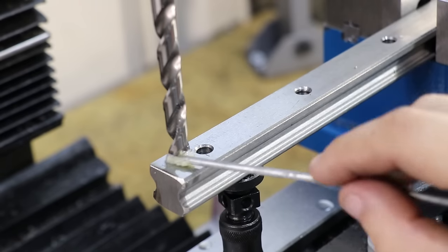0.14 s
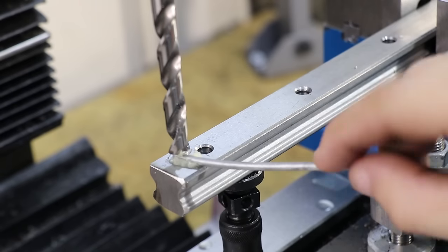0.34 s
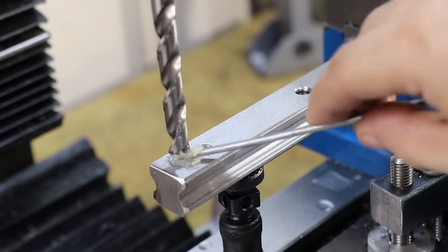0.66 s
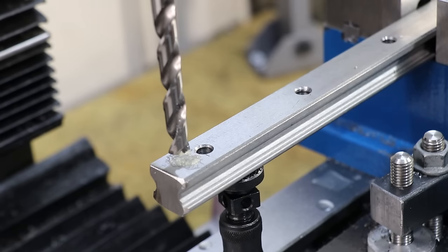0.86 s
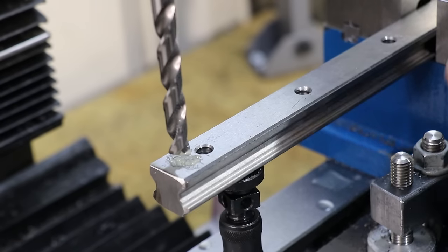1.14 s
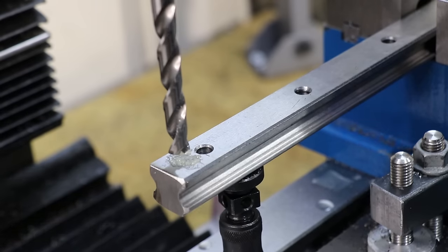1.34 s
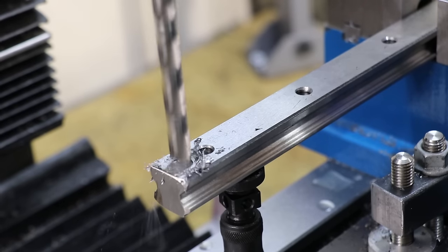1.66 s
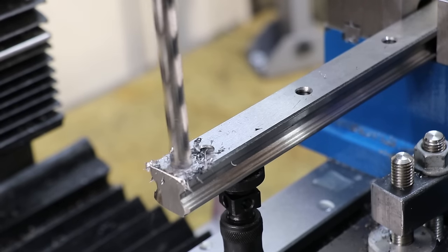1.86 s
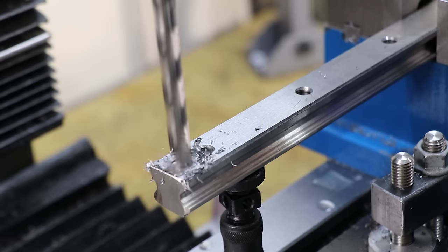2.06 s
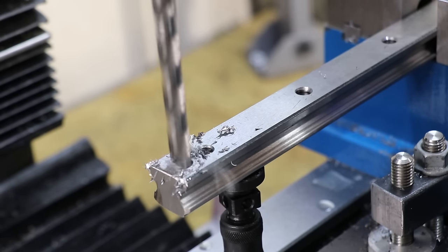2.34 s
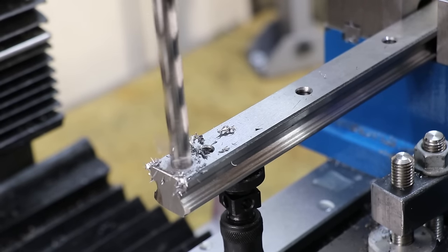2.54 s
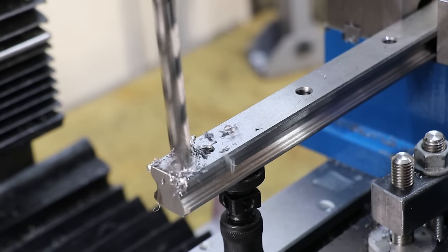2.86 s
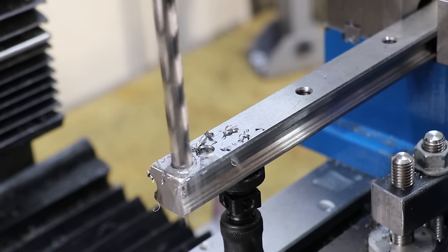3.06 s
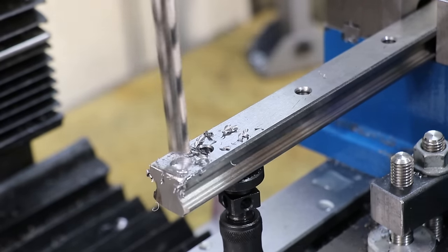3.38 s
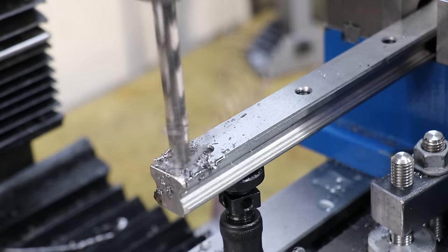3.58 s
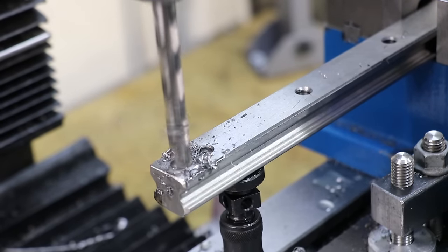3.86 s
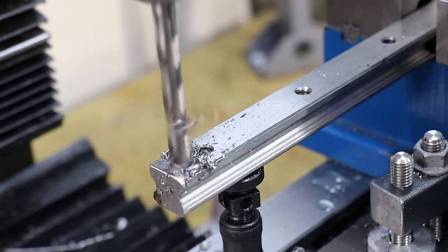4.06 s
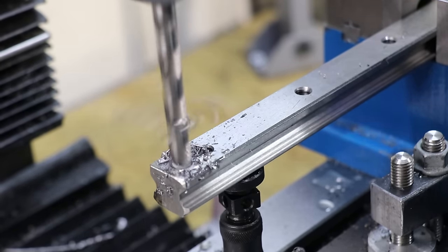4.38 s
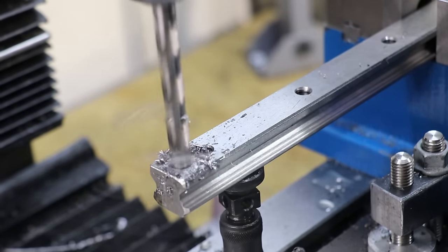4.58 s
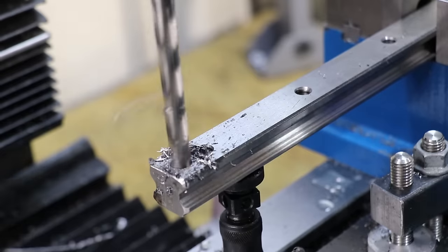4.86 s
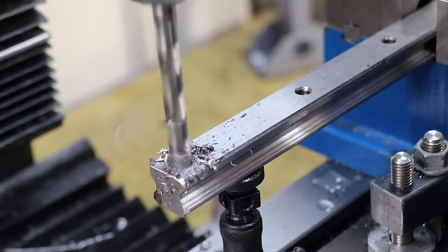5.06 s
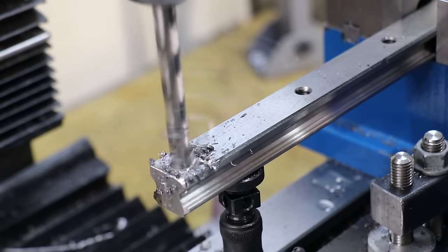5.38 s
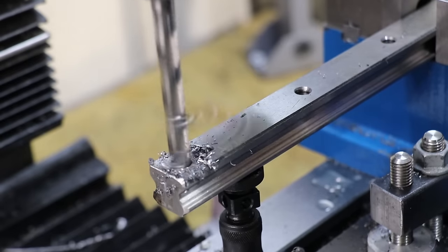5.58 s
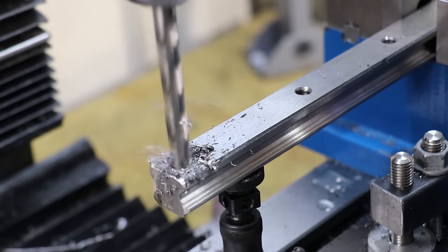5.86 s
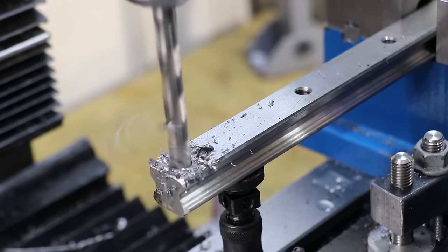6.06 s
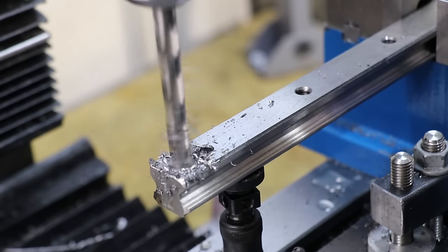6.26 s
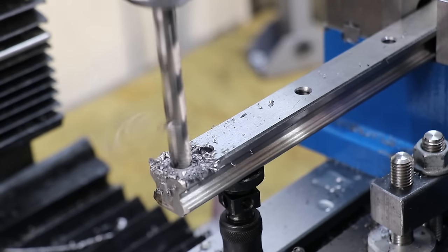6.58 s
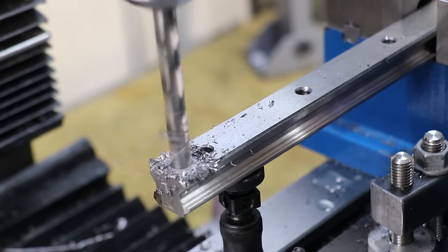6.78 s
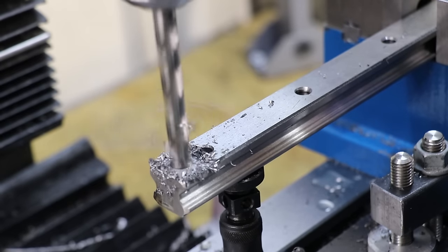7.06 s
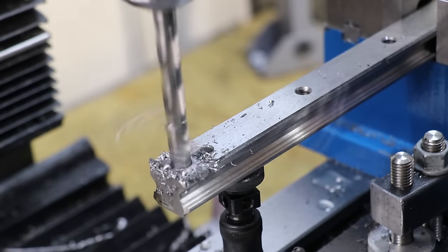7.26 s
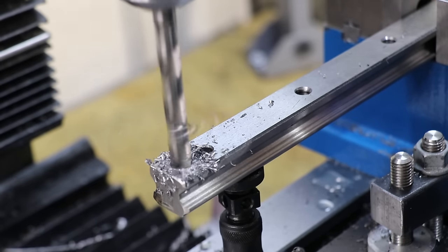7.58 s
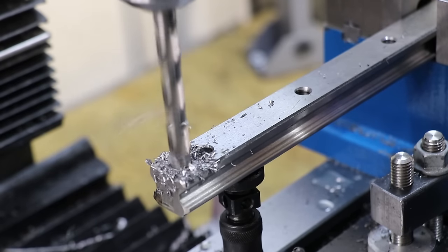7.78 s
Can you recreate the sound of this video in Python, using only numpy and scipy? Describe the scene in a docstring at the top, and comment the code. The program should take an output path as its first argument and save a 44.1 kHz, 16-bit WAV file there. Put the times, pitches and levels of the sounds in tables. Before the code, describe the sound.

Close stereo pickup in a quiet workshop with soft air noise and a low hum. A wire dabs grease on a steel rail with tiny taps, short hisses and thin squeaks. A switch clacks loudly, then weaker, and drilling bursts in: a dense, bright, gritty roar and hiss. Six times the drill lifts, the hiss drops, a hoarse feed whine and dull knocks show through, and cutting bites again.

```python
"""Wire taps, hisses and thin squeaks come first, over workshop air and a low hum; then a switch clacks.
From START_S on a milling machine drills close by: shaped noise roars in the frame and hisses with the chip load.
Six times the drill backs out: the hiss drops, wandering tooth-rate harmonics whine from the feed drive,
and dull noise bursts knock around the lifts and reversals. Taps, knocks and catching chips are decaying
noise bursts; the switch adds sharp snaps and damped sines."""
import sys
import numpy as np
from scipy import signal
from scipy.fft import rfft, irfft, next_fast_len
from scipy.io import wavfile
from scipy.ndimage import uniform_filter1d

SR = 44100
rng = np.random.default_rng(int(sys.argv[2]) if len(sys.argv) > 2 else 0)


def dump(signal):
    """Clip the signal to [-1, 1] and save it as 16-bit WAV at the path in sys.argv[1]."""
    limited = np.clip(np.atleast_2d(signal).T, -1, 1)
    pcm = np.round(limited * 32767).astype(np.int16)
    wavfile.write(sys.argv[1], SR, pcm)


N = 349272
T = np.arange(N) / SR
SIZE = next_fast_len(N + SR)  # room for filter tails
F = np.maximum(np.arange(SIZE // 2 + 1) * SR / SIZE, 1)  # Hz

# The drill backs out: lift_s, feed_reverses_s, whine_ends_s
PECK_TIMES = [(3.19, 3.522, 3.535), (3.692, 3.845, 3.868), (4.733, 4.978, 5.028), (5.613, 5.768, 5.838),
              (6.44, 6.562, 6.632), (7.36, 7.545, 7.638)]
# Whine and load at each peck: tenth_harmonic_hz (at the lift), tenth_db, ninth_first_db, ninth_last_db,
# clear_load_db (chip load while out of the cut)
PECK_WHINES = [(1805, -32, -39, -31, -46), (1843, -32, -50, -37, -48), (1810, -31, -45, -39, -48.5),
               (1827, -32, -57, -40, -46), (1818, -31, -56, -35.5, -50), (1824, -32, -53, -37, -51)]

START_S, SPINDLE_HZ = 1.6875, 33.9
TOP_HZ = 15850

# A random phase offset between the two ports, wandering over frequency and widest in the treble
TWIST_RAD, TWIST_HZ = 1.75, 501
TWIST = TWIST_RAD * F / TOP_HZ * np.interp(F, TWIST_HZ * np.arange(60), rng.standard_normal(60))


def undb(db):
    """Decibels to amplitude."""
    return 10 ** (np.asarray(db) / 20)


def unit(x):
    """Scale to rms 1."""
    return x / np.sqrt(np.mean(x ** 2))


def over_hz(points):
    """Values of (Hz, value) points at every frequency, straight over log frequency."""
    hz, value = np.transpose(points)
    return np.interp(np.log(F), np.log(hz), value)


def shape(points):
    """Gain over frequency from (Hz, dB) points."""
    return undb(over_hz(points))


def peaks(modes):
    """Gain over frequency of steep-sided resonances whose powers add."""
    power = 0
    for hz, width_hz, db in modes:
        power = power + undb(2 * db) / (1 + (1.35 * (F - hz) / width_hz) ** 2) ** 2
    return np.sqrt(power)


def track(points):
    """The value of an (s, dB) curve at every sample."""
    return np.interp(T, *np.transpose(points))


def gate(start, end, fade_s):
    """Open between two times, with straight fades inside them."""
    return np.clip(np.minimum(T - start, end - T) / fade_s, 0, 1)


def walk(rate):
    """Random levels held 1 / rate s and slewed twice; spread near 1."""
    hold = int(SR / rate)
    steps = np.repeat(rng.standard_normal(N // hold + 1), hold)
    return 0.75 * uniform_filter1d(uniform_filter1d(steps, hold), hold)[:N]


def add(out, s, sound):
    """Mix a sound in at a time, cut at the end of the scene."""
    i = int(s * SR)
    out[:, i:i + sound.shape[-1]] += sound[..., :N - i]


def stereo(near, far):
    """Two spectra into two close microphone ports: how alike and how loud they are varies with pitch."""
    # Likeness between the ports: pitch_hz, likeness (0-1)
    likeness = [(60, .95), (130, 0.83), (290, 0.83), (640, 0.95), (1410, 0.97), (2400, 0.79), (4400, 0.43),
                (8000, 0.48), (15000, 0.44)]
    # Balance between the ports: pitch_hz, left_minus_right_db
    balance = [(60, 6), (110, 0), (200, 2), (380, 0.0), (700, 0.5), (1290, 1), (2380, 1.0), (4400, -0.5),
               (8120, -2.0), (15000, -3)]
    alike = np.clip(over_hz(likeness), 0, 1)
    lean = np.sqrt(shape(balance)) * np.exp(.5j * TWIST)
    same = np.sqrt((1 + alike) / 2) * near
    apart = np.sqrt((1 - alike) / 2) * far
    return irfft(np.array([(same + apart) * lean, (same - apart) / lean]), SIZE)[:, :N]


def rumble(gain, flicker_db, turn):
    """Gritty resonant noise at rms 1; each octave flickers alone and throbs once and twice a spindle turn."""
    grit = undb(1.5 * walk(900))
    mid, side = (rfft(grit * rng.standard_normal(N), SIZE) * gain for _ in range(2))
    edges_hz = 150 * 2 ** np.arange(0, 7.5)
    out = 0
    for lo, hi in zip(edges_hz[:-1], edges_hz[1:]):
        band = (F >= lo) & (F < hi)
        angle = 2 * np.pi * (SPINDLE_HZ * T + rng.random())
        throb = 1 + turn * (np.sin(angle) + np.sin(2 * angle))
        out = out + stereo(mid * band, side * band) * throb * undb(flicker_db * walk(12))
    return unit(out)


def hoarse(phase, width_hz, rough):
    """A tone whose size and phase wander; rms 1."""
    wander = walk(width_hz) + 1j * walk(width_hz)
    return unit(np.real((1 + rough * wander) * np.exp(1j * phase)))


def burst(hz, width, t60, rise_s):
    """Decaying noise around one pitch, peak near 1, slightly different at each port."""
    t = np.arange(int(.3 * SR)) / SR
    edges_hz = [max(hz - width / 2, 60), min(hz + width / 2, 17000)]
    sos = signal.butter(2, edges_hz, "band", fs=SR, output="sos")
    mid, side = signal.sosfilt(sos, rng.standard_normal((2, len(t))))
    pair = unit(mid) + 0.42 * unit(side) * np.array([[1], [-1]])
    return 0.41 * pair * (1 - np.exp(-t / rise_s)) * 1000 ** (-t / t60)


def shop():
    """Workshop air as shaped noise, lower once the drill runs, under a low hum that comes and goes."""
    # Spectrum of the air: pitch_hz, relative_db_per_hz
    air_spectrum = [(50, -38), (85, -12), (116, -5.5), (175, -7.5), (223, -5), (310, -4), (353, -6),
                    (412, -10), (697, -9.5), (2180, -11.5), (2600, -15.5), (16000, -22)]
    # Hum passages: start_s, length_s, pitch_hz, glide_hz_per_s, level_db
    hums = [(.0, .42, 129.8, -3, -67), (.52, .2, 149, 60, -66), (.76, .22, 172, -30, -69),
            (1.18, .1, 184, 1, -61), (1.33, 0.44, 169.5, 12, -66.5), (3.15, .3, 108, 3, -75),
            (3.673, 0.24, 111, -20, -69), (4.053, .4, 116, -29, -71), (4.4, 0.4, 105, -2, -68),
            (5.6, .4, 110, -20, -69.5), (6.181, 0.52, 101.6, 11, -71), (7.3, .22, 102, 1, -73)]
    air_db, duck_db, hum_fade_s = -57, -2.5, 0.057
    mid, side = (rfft(rng.standard_normal(N), SIZE) * shape(air_spectrum) for _ in range(2))
    level_db = air_db + duck_db * (T > START_S) + 0.34 * walk(3.5)
    out = unit(stereo(mid, side)) * undb(level_db)
    for s, length, hz, glide, db in hums:
        phase = 2 * np.pi * (hz + glide * (T - s) / 2) * (T - s)
        out = out + gate(s, s + length, hum_fade_s) * undb(db) * hoarse(phase, 5.3, 0.34)
    return out


def wire():
    """A wire dabs grease on a steel rail: small taps, slides hissing in its resonances, thin squeaks."""
    # Taps: start_s, peak_db, pitch_hz, t60_s
    taps = [(0.0624, -39.5, 3030, .26), (.1825, -39.5, 3500, .11), (.4788, -43.5, 8000, .043),
            (.54, -47, 7000, .046), (.647, -46, 5000, .06), (.9517, -47, 4500, .12), (1.019, -40, 4130, .1),
            (1.127, -42.5, 4850, 0.16), (1.525, -52, 6100, .059)]
    # Slides: start_s, peak_db (before the rail levels), t60_s
    slides = [(.114, -42, .18), (.183, -40, 0.041), (.65, -50, 0.072), (.786, -42, 0.072)]
    # Rail resonances: pitch_hz, width_hz, relative_db
    rail_modes = [(5310, 500, 1.5), (9900, 980, 0.5), (12300, 990, -5)]
    # Squeaks: centre_s, level_db, length_s
    squeaks = [(.125, -67, .06), (.2, -66, 0.056), (0.343, -62, 0.037), (.42, -67, 0.057),
               (.485, -60, 0.034), (.53, -62, 0.037), (.66, -52, 0.023), (.752, -53, 0.015),
               (0.792, -66, 0.046)]
    squeak_hz = 2165
    swell = sum(undb(db) * np.exp(-(2 * (T - s) / length) ** 2) for s, db, length in squeaks)
    out = swell * hoarse(2 * np.pi * squeak_hz * T, 90.3, 0.96) * np.ones((2, 1))
    for s, db, hz, t60 in taps:
        add(out, s, undb(db) * burst(hz, 0.73 * hz, t60, 0.0011))
    for s, db, t60 in slides:
        add(out, s, sum(undb(db + g) * burst(hz, width, t60, 0.0017) for hz, width, g in rail_modes))
    return out


def switch():
    """Each blow snaps sharply, rings the housing as damped sines and rattles out in noise."""
    # Blows and bounces: start_s, peak_db, left_minus_right_db
    blows = [(1.2018, -10, -5), (1.2075, -19, 5), (1.2114, -7.5, 0.5), (1.2178, -22, -2), (1.221, -23, 0),
             (1.4276, -24, 2), (1.431, -28, -3), (1.437, -43, -1), (1.4435, -33, 7), (1.452, -41, 1)]
    # Ringing modes: pitch_hz, relative_db, t60_s (before the housing damps it)
    modes = [(749, 5, 0.12), (923, 0, 0.13), (1164, 4, 0.41), (1470, 1.5, 0.088), (1650, -4, 0.093),
             (1820, -4, 0.083), (2270, -3, 0.069), (2470, -21, 0.13), (2750, -4, 0.11), (4500, 3, 0.051),
             (4650, -15, 0.077), (4840, -11, 0.051), (5093, -26, 0.19), (5100, -11, 0.3),
             (5860, -21, 0.092), (6870, -20, 0.039), (7946, -28, 0.071), (8489, -33, 0.096),
             (9700, -32, 0.045), (10600, -29, 0.058)]
    housing_t60_s = .085  # no mode rings longer
    out, t = np.zeros((2, N)), np.arange(int(.3 * SR)) / SR
    snap = np.sin(2 * np.pi * 3500 * t) * np.exp(-t / .00016)
    for s, db, pan_db in blows:
        ring = 0
        for hz, mode_db, t60 in modes:
            decay = 1000 ** (-t / min(t60, housing_t60_s))
            ring = ring + undb(mode_db) * np.sin(2 * np.pi * (hz * t + rng.random())) * decay
        rattle = 0.6 * burst(6100, 6000, 0.011, .0001) + 0.26 * burst(2900, 5500, 0.098, 0.001)
        blow = 0.37 * ring / np.abs(ring).max() - 0.99 * snap + rattle
        add(out, s, blow * undb(db + np.array([[pan_db], [-pan_db]]) / 2))
    # too small to radiate bass
    return signal.sosfilt(signal.butter(4, 620, "high", fs=SR, output="sos"), out)


def feed():
    """Backing out: hoarse tooth-rate harmonics, a shaken frame, dull knocks around the lifts and reversals."""
    # Other harmonics: multiple of the tooth rate, level_db (relative to the tenth)
    teeth = [(12, -13.5), (24, -10.5)]
    # Knocks: start_s, peak_db, pitch_hz
    knocks = [(3.189, -40, 308), (3.242, -47, 240), (3.527, -47, 447), (3.681, -43, 366), (3.821, -47, 438),
              (4.721, -43, 320), (4.975, -38.5, 318), (5.18, -50, 427), (5.606, -41.5, 245),
              (5.762, -38.5, 401), (5.864, -43, 299), (6.432, -41, 218), (6.558, -43, 326),
              (7.358, -45, 430), (7.546, -43, 326)]
    # Frame shaken by the fast feed: pitch_hz, width_hz, relative_db
    slide_modes = [(854, 65, -15.5), (1095, 21, -23), (1380, 21, -5), (1707, 150, -6.5), (2353, 90, -4),
                   (2890, 88, -14), (3247, 44, -5.5), (3592, 110, -3.5), (3890, 76, -6.5), (4234, 55, -3.5),
                   (4820, 28, -4.5), (5147, 85, -3.5), (5440, 36, -5.5), (6150, 37, -3), (6850, 22, -2.5),
                   (7400, 78, -13)]
    # Noise between those resonances: pitch_hz, relative_db_per_hz
    slide_bed = [(400, -76), (650, -25.5), (1000, -24.5), (1250, -11), (2300, -16.5), (2630, -23),
                 (4000, -16), (7050, -14.5), (10000, -17.5), (15800, -26)]
    # Low tone in the first lift: time_s, level_db
    groan_curve = [(3.25, -69), (3.3, -57), (3.5, -70), (3.53, -64)]
    # the whine sags, and steps down as the feed reverses
    sag_hz_per_s, down_hz, down_db, turn_s = 85, -45, -9.5, 0.0203
    shake_db, shake_fall_db_per_s, spin_s = -28.5, 109, 0.015
    groan_hz = 414
    hz, tenth, ninth, shake = np.zeros((4, N))
    for (lift, back, end), (top_hz, tenth_db, first_db, last_db, _) in zip(PECK_TIMES, PECK_WHINES):
        on = gate(lift, end, spin_s)
        braking = np.clip(T - back, 0, end - back)  # seconds since the reversal
        down = np.minimum(braking / turn_s, 1)
        hz = hz + (on > 0) * (top_hz - sag_hz_per_s * (T - lift) + down_hz * down)
        tenth = tenth + on * undb(tenth_db + down_db * down)
        ninth = ninth + on * undb(np.interp(T, [lift, back], [first_db, last_db]))
        shake = shake + on * undb(shake_db - shake_fall_db_per_s * braking)
    tooth = 2 * np.pi * np.cumsum(hz / 10) / SR  # phase at the tooth rate
    whine = tenth * hoarse(10 * tooth, 40, 0.13) + ninth * hoarse(9 * tooth, 40, 0.25)
    for multiple, db in teeth:
        whine = whine + tenth * undb(db) * hoarse(multiple * tooth, 150, 1.2)
    groan_level = gate(groan_curve[0][0], groan_curve[-1][0], spin_s) * undb(track(groan_curve))
    groan = groan_level * hoarse(2 * np.pi * groan_hz * T, 25, .3)
    tones = rfft(whine + groan, SIZE)
    slide = np.hypot(peaks(slide_modes), shape(slide_bed))
    out = stereo(tones, tones * 1j)  # a quarter turn sets the ports apart
    out = out + shake * rumble(slide, flicker_db=0.44, turn=0.15)
    for s, db, knock_hz in knocks:
        thud = burst(knock_hz, 145, 0.19, 0.0017) + 1.44 * burst(600, 670, 0.16, 0.0065)
        add(out, s, undb(db) * thud)
    return out


def load():
    """Chip load in dB: it dies as the drill lifts, bites again softly at the reversal and settles."""
    # Chip load while cutting: time_s, load_db
    cutting = [(1.69, -35), (2.21, -34), (3.1, -34), (4.25, -34.5), (4.6, -35), (5.3, -35), (6.05, -36),
               (6.4, -34), (6.7, -35.5), (7.05, -35), (7.3, -35.5), (7.75, -36.5), (7.92, -36)]
    lift_s, bite_s, settle_s, bite_db = 0.029, 0.013, 0.16, -3
    db = track(cutting)
    for (lift, back, _), (*_, clear_db) in zip(PECK_TIMES, PECK_WHINES):
        clear = np.interp(T, [lift, lift + lift_s, back - bite_s / 2, back + bite_s / 2], [0, 1, 1, 0])
        soft = np.interp(T, [lift, back, back + settle_s], [0, 1, 0])
        db = (1 - clear) * (db + bite_db * soft) + clear * clear_db
    return db


def drill():
    """The cut shakes the frame and hisses with the chip load; the tip rings at first, chips catch at times."""
    # Frame resonances while cutting: pitch_hz, width_hz, relative_db
    frame_modes = [(245, 14, -23), (421, 58, -20.5), (513.4, 9, -15.5), (738.3, 33.3, -7), (893, 70, -13),
                   (1125, 39, -6.5), (1280, 44, -7), (1400, 25, -1), (1545, 23, -6.5), (1688, 42, 2.5),
                   (2000, 54, -2), (2375, 69, 0.5), (2745, 28, -6), (3068, 50, -3.5), (3358, 50, -5),
                   (3690, 64, -0.5), (4077, 54, 1), (4310, 21, 0), (5140, 95, -6), (6260, 630, -7),
                   (6940, 450, -7), (8230, 79, -12), (8600, 76, -12), (9280, 140, -10), (10180, 110, -8),
                   (12300, 91, -12), (13400, 160, -8), (14700, 160, -9), (15250, 150, -6), (15700, 80, -11)]
    # Noise between those resonances: pitch_hz, relative_db_per_hz
    frame_bed = [(90, -62), (150, -51), (590, -26), (730, -17.5), (990, -20.5), (1150, -11.5), (2350, -8),
                 (2600, -10), (3740, -7), (7000, -10), (9000, -12), (15800, -10)]
    # Tip resonances: pitch_hz, width_hz, relative_db
    tip_modes = [(400, 90, -17), (1560, 40, -3), (1718, 45, 2), (10400, 220, -4), (11850, 400, -1),
                 (13250, 150, -7), (15300, 400, -3)]
    # The tip rings until the lips are buried: time_s, level_db
    tip_fade = [(1.69, -34), (2.2, -32), (2.9, -35), (3.17, -38), (3.2, -70)]
    # Chips catching on the drill: start_s, peak_db, pitch_hz, t60_s, width_hz
    scrapes = [(3.19, -19, 3400, 0.12, 500), (3.2, -23, 2400, 0.17, 250), (3.745, -18, 4830, .12, 1800),
               (3.77, -17, 6150, 0.092, 1000), (3.816, -12, 11000, .04, 9000),
               (4.252, -21, 11000, .05, 9000), (5.69, -17, 3850, 0.19, 700), (6.166, -17, 1410, .11, 160),
               (6.452, -15.5, 2350, .07, 200), (7.441, -18, 4020, 0.18, 1200)]
    hiss_db, roar_db = 4.5, 9  # above the chip load
    load_db = load()
    frame = np.hypot(peaks(frame_modes), shape(frame_bed))
    treble = 1 / (1 + (8500 / F) ** 6)  # share of the power that goes to the hiss
    hiss = rumble(frame * np.sqrt(treble), flicker_db=1.76, turn=0.13) * undb(load_db + hiss_db)
    body_db = np.minimum(load_db, -39)  # the frame saturates at full load
    roar = rumble(frame * np.sqrt(1 - treble), flicker_db=0.73, turn=0.021) * undb(body_db + roar_db)
    ring = rumble(peaks(tip_modes), flicker_db=0.2, turn=0.09) * undb(track(tip_fade))
    out = (T > START_S) * (roar + hiss + ring)
    for s, db, hz, t60, width in scrapes:
        add(out, s, undb(db) * burst(hz, width, t60, 0.0082))
    return out


def scene():
    """All sources together."""
    return shop() + wire() + switch() + feed() + drill()


def record(dry):
    """The recorder cuts the top with a steep low-pass."""
    return signal.sosfilt(signal.ellip(10, .2, 70, TOP_HZ, fs=SR, output="sos"), dry)


dry = scene()
out = record(dry)
dump(out)
```